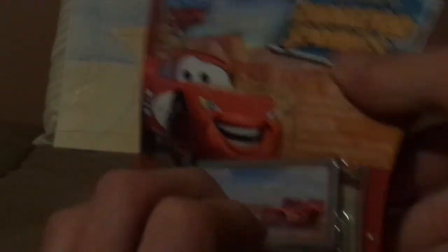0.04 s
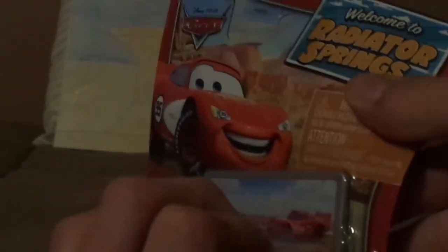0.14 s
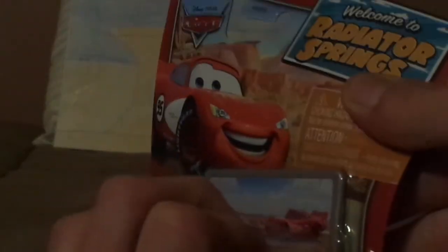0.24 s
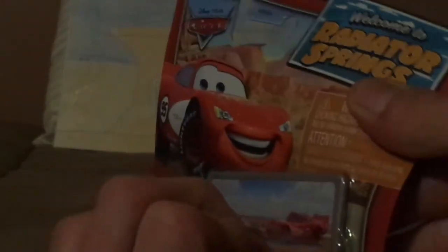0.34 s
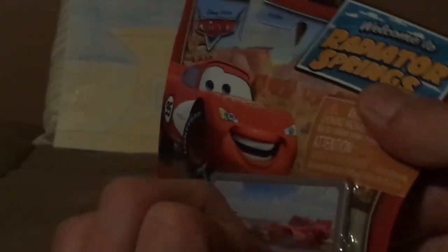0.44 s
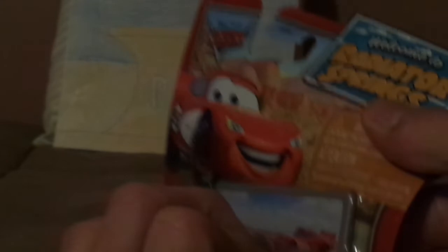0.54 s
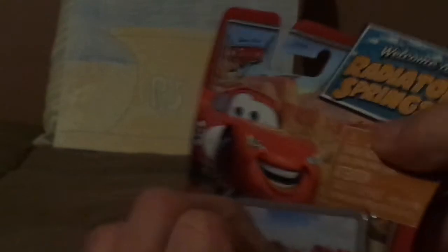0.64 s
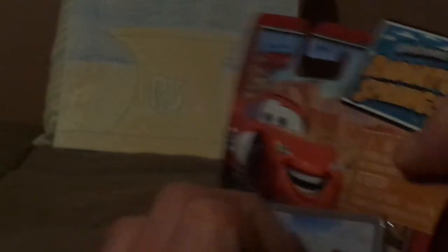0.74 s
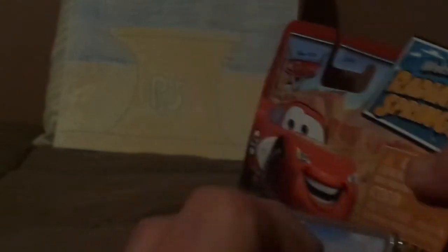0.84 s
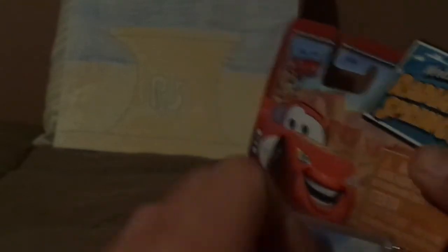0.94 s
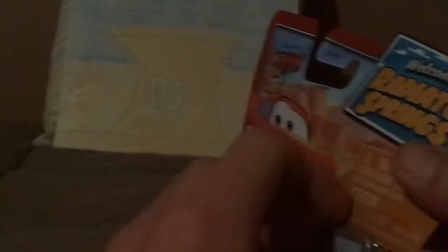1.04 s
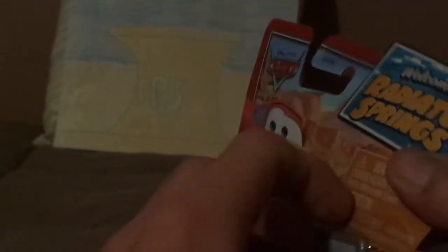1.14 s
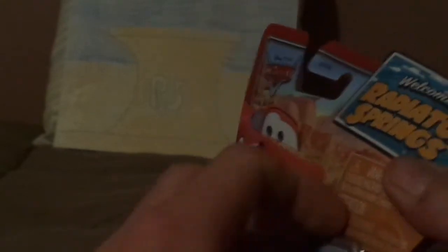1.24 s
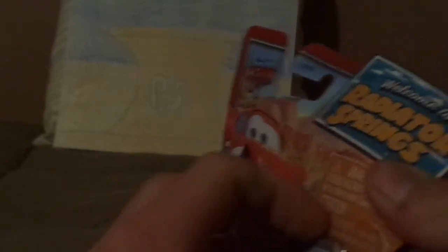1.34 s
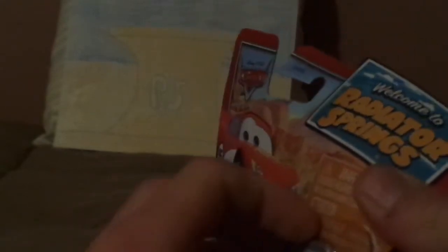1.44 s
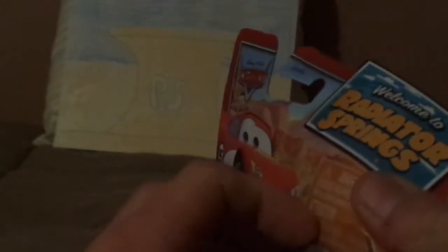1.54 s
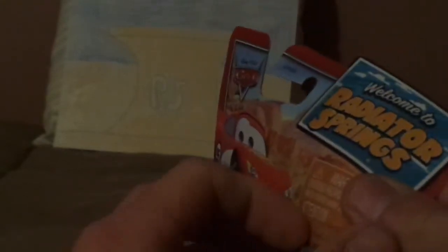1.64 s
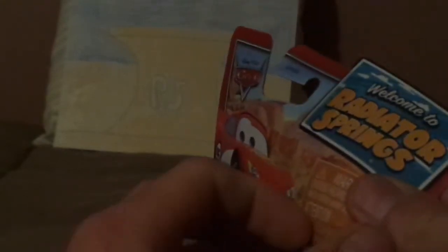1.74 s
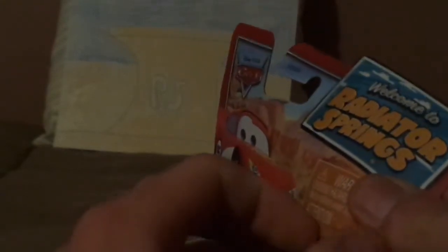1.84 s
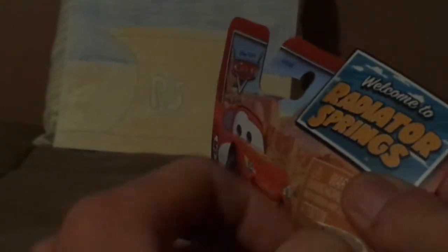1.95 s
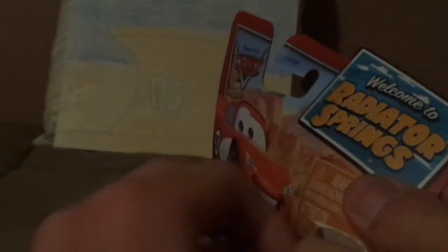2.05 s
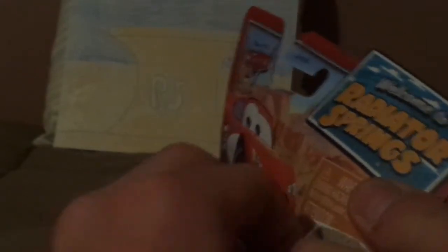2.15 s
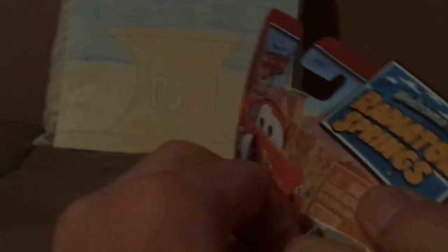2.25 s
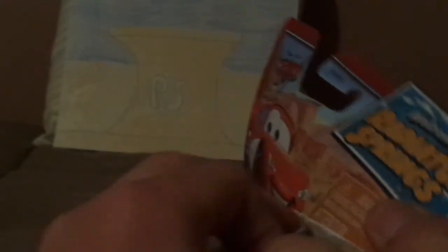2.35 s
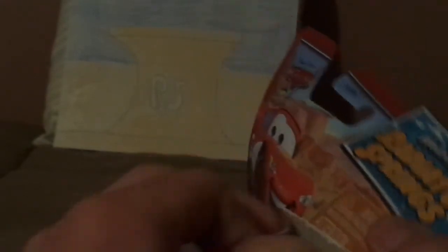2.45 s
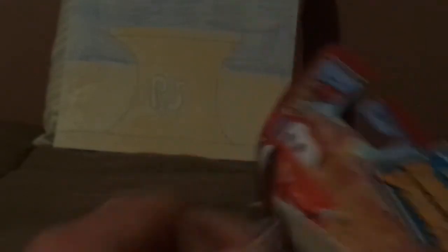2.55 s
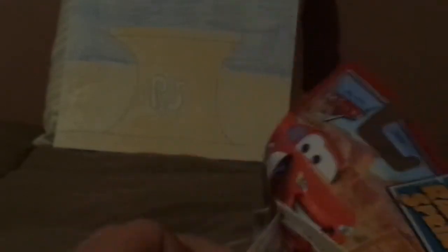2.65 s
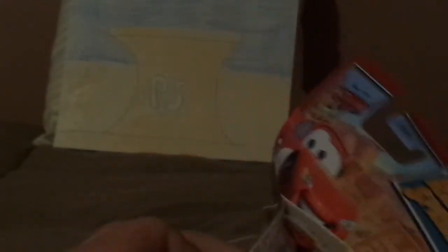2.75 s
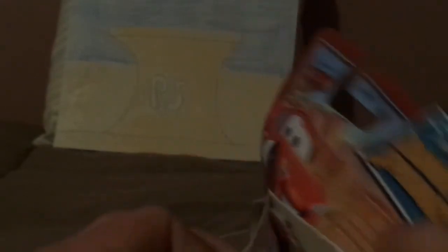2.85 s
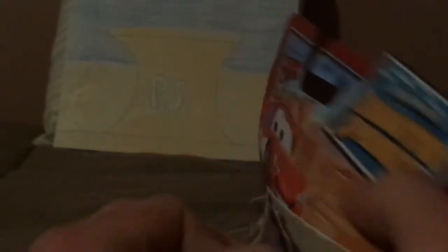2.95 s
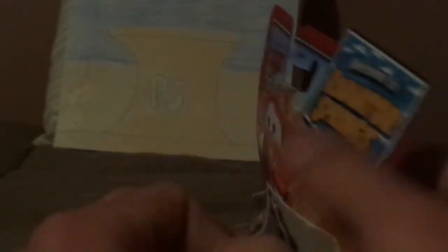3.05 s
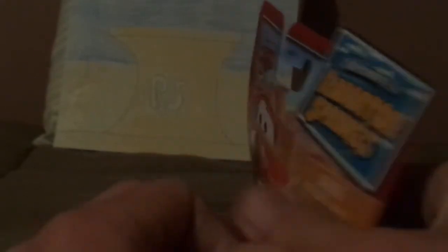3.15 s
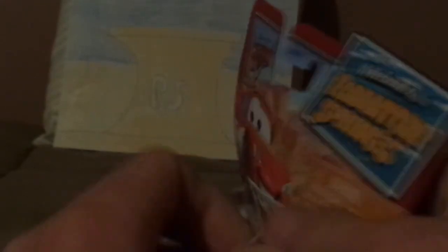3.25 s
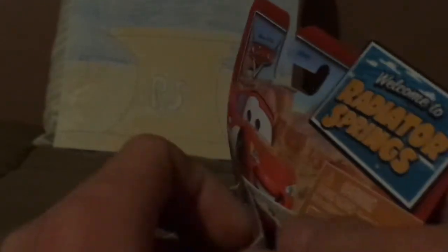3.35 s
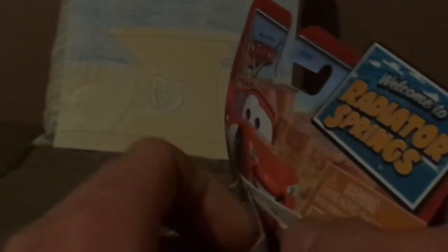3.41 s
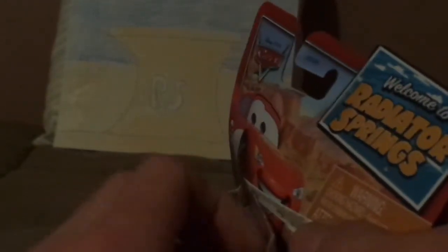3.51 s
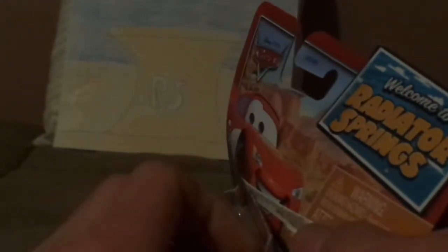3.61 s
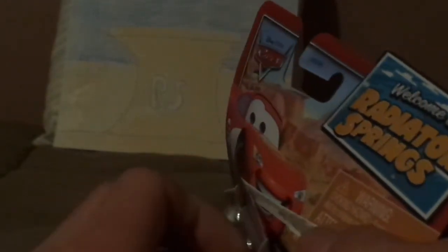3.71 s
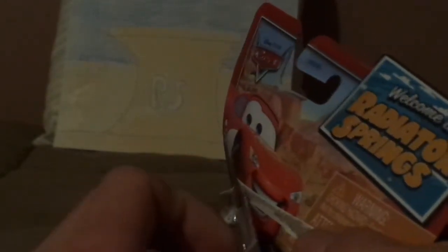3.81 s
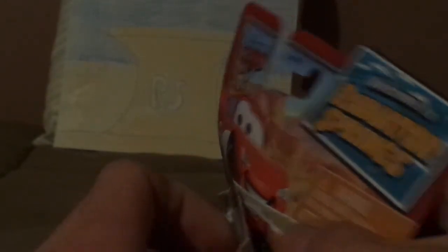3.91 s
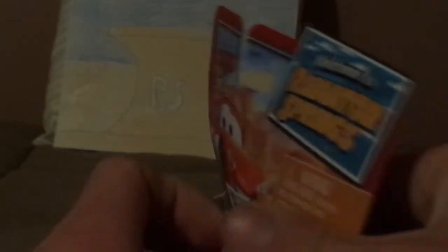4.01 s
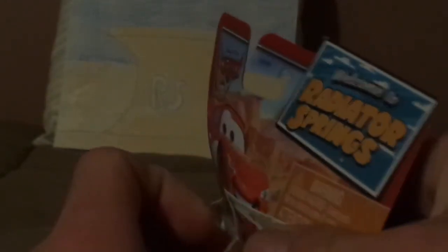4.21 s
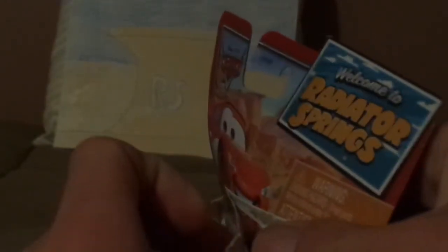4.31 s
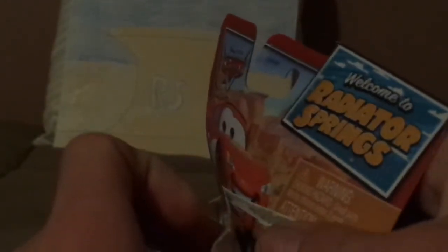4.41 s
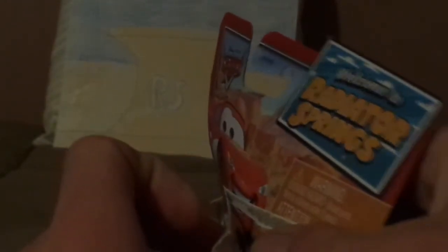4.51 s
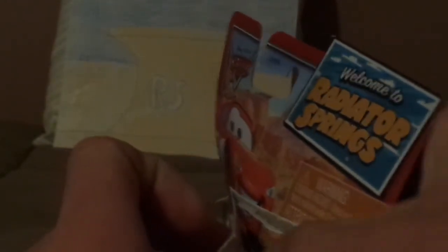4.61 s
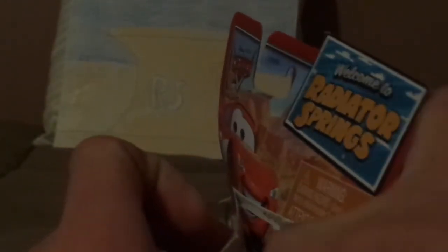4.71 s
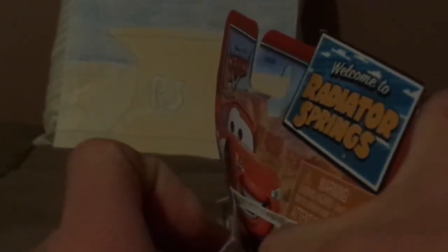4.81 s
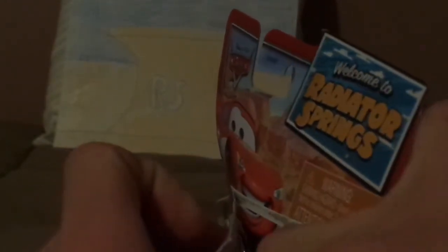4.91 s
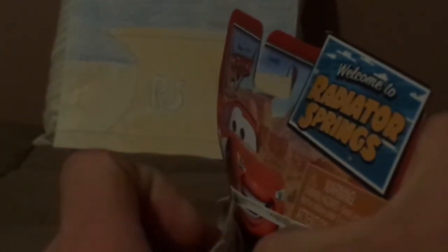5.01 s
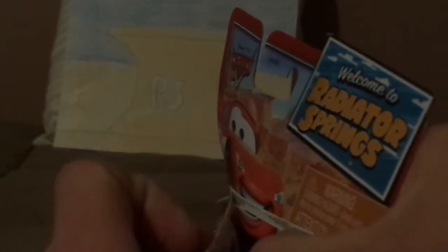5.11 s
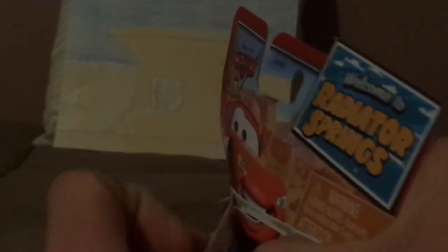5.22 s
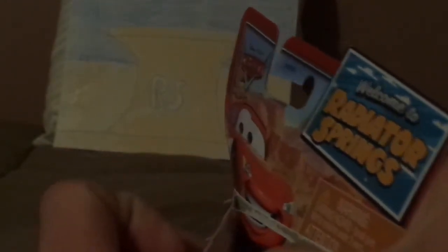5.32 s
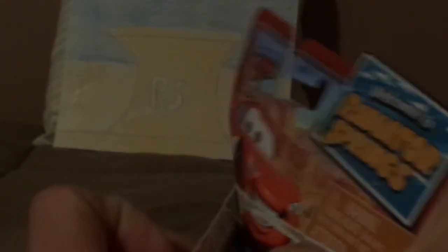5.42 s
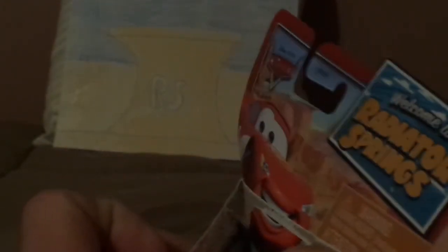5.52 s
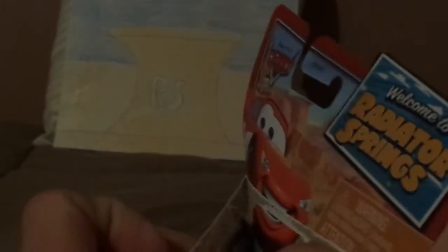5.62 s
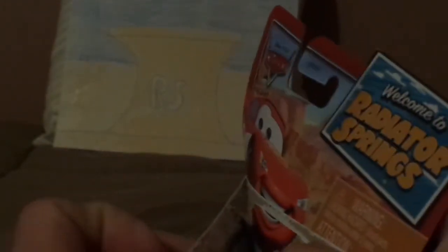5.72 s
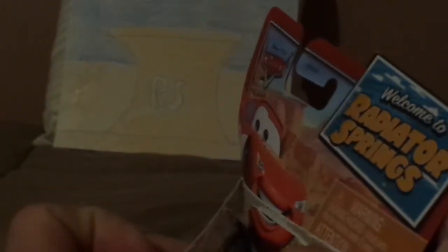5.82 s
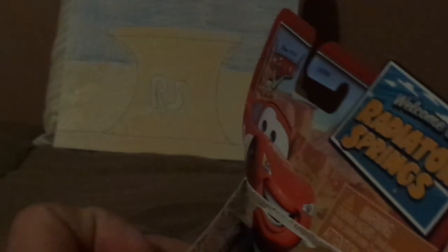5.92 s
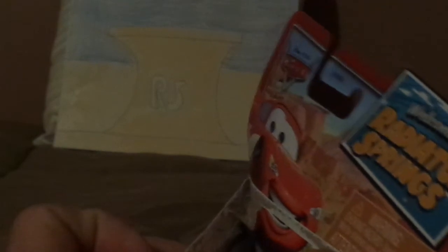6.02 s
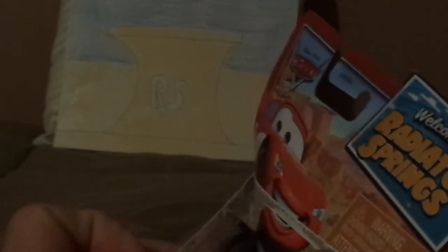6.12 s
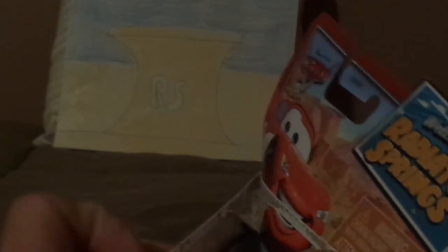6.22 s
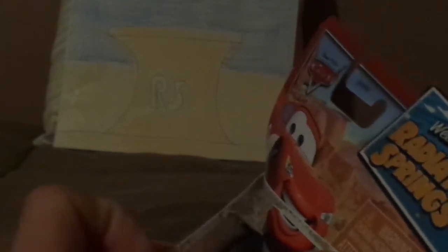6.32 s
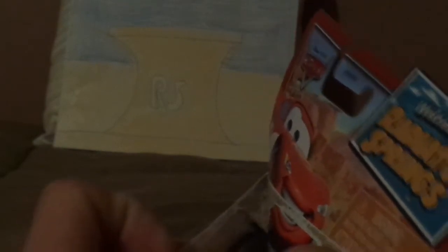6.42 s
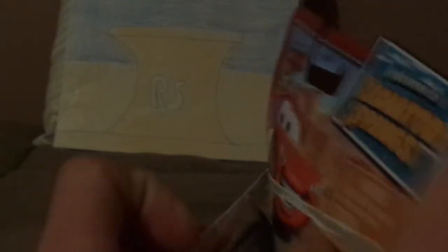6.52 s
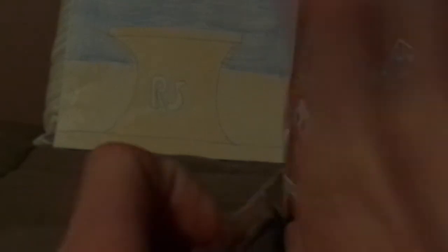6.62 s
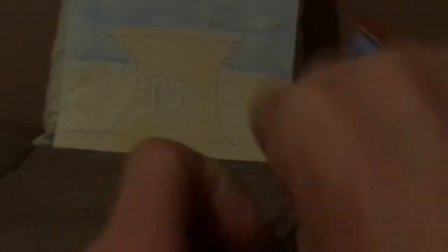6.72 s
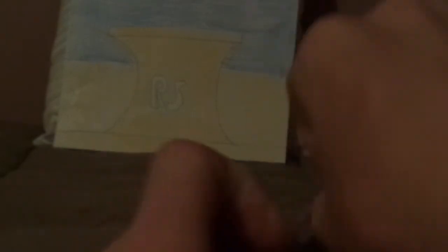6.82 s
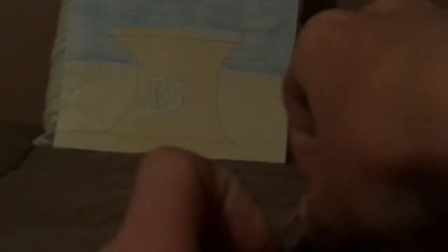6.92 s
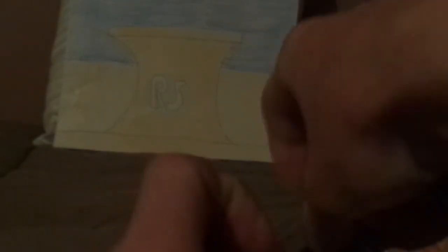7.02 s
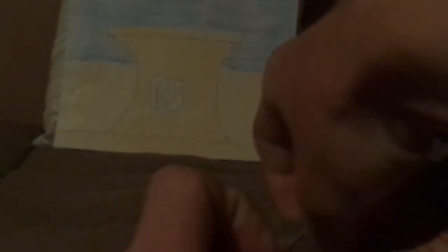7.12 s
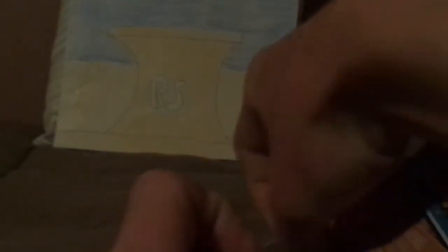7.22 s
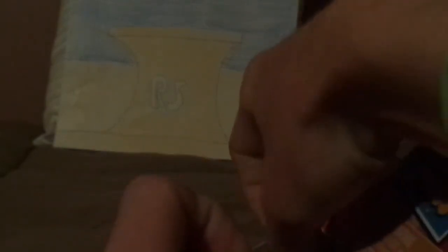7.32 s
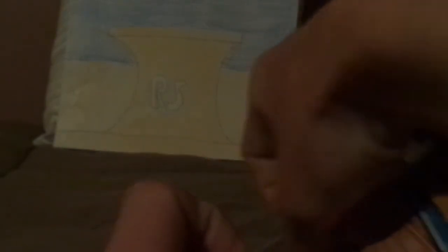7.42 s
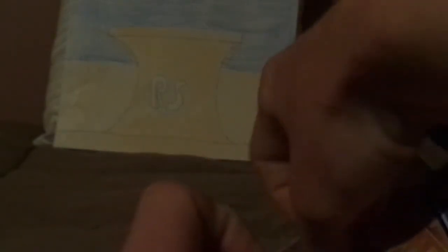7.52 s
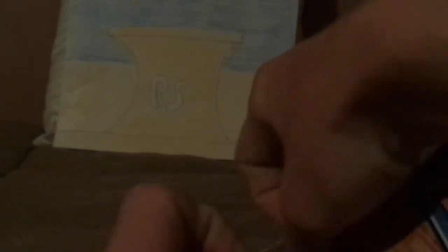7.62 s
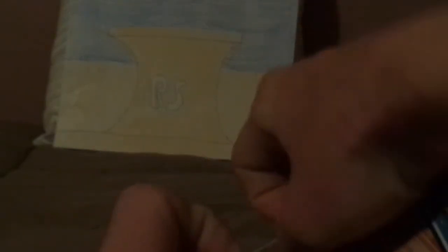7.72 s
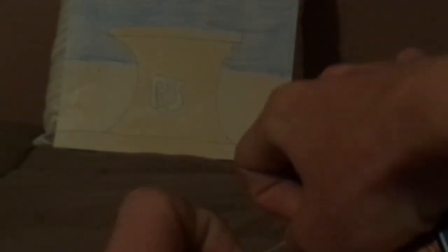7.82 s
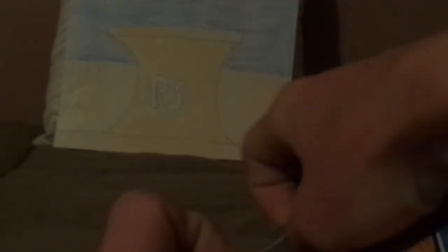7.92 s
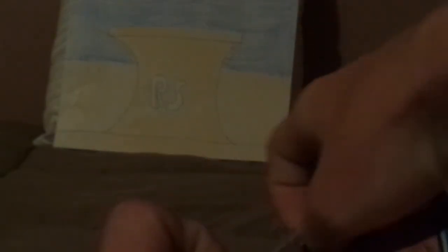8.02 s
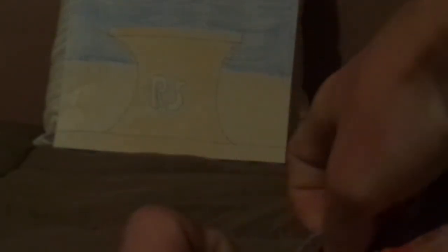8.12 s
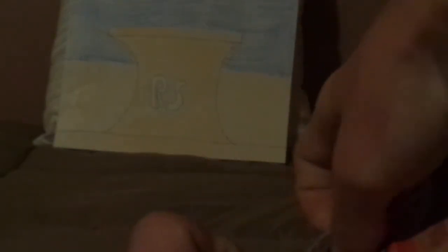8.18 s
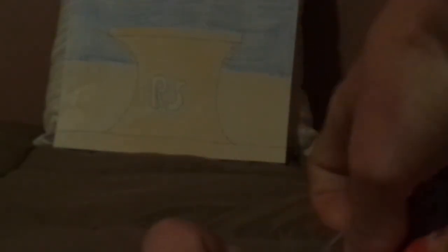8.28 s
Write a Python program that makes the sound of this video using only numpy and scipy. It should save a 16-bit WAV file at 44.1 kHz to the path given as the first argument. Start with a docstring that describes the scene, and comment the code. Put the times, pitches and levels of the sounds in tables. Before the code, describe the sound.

Hands tear a stiff plastic blister pack from its card, dense crackling and crinkling with sharp snaps and ripping, close up in a quiet room.

```python
"""Quiet furnished room: two hands tear a stiff plastic blister from its card, close to the microphone.
Glue joints and creases let go in snaps: noise bursts through broad resonances of card, shell and crack edge.
Glue also peels in runs of even jerks; each pull tears fibres and rubs the pack in dense random grains.
The room answers with decaying noise tails; steady mains hum and coloured hiss lie underneath."""
import sys
import numpy as np
from scipy import signal
from scipy.fft import rfft, irfft, next_fast_len
from scipy.io import wavfile
from scipy.ndimage import uniform_filter1d

SR = 44100
rng = np.random.default_rng(int(sys.argv[2]) if len(sys.argv) > 2 else 0)


def master_out(mix):
    """Clip the mix to full scale and print it as 16-bit PCM to the path in sys.argv[1]."""
    frames = np.transpose(np.atleast_2d(mix))
    ceiling = np.clip(frames, -1, 1)
    pcm = np.round(ceiling * 32767).astype(np.int16)
    wavfile.write(sys.argv[1], SR, pcm)


N = 368235

# loudest releases of creases and glue joints:
# [t/s, card thump energy/dB, card pitch/Hz, wall energy/dB, rim energy/dB, edge energy/dB]
SNAPS = [(0.0349, -23, 1180, -23, -31, -40), (0.116, -25, 1210, -21, -17, -37),
         (0.1615, -36, 655, -33, -20, -41), (0.1546, -16, 1240, -13.5, -15.5, -32),
         (0.1748, -24, 690, -14, -11.5, -23), (0.1901, -23, 664, -15, -13, -18),
         (0.1954, -17, 1290, -27, -11, -33), (0.2194, -13.5, 1240, -13.5, -12, -20),
         (0.2305, -40, 1080, -44, -19, -30), (0.2418, -34, 1280, -28, -19, -35),
         (0.257, -20, 700, -16, -16, -23), (0.2694, -19, 1280, -32, -18, -32),
         (0.277, -18.5, 710, -16, -13, -20), (0.2953, -17, 685, -15, -14, -28),
         (0.289, -34, 1130, -32, -17, -32), (0.3699, -14, 850, -13, -11.5, -18),
         (0.391, -19, 1240, -30, -20, -20), (0.4134, -13, 724, -14.5, -10.5, -28),
         (0.4342, -14, 1280, -32, -22, -18), (0.4434, -14, 730, -17, -11, -32),
         (0.4526, -18, 1260, -20, -15.5, -21), (0.5091, -18.5, 1250, -29, -18, -18.5),
         (0.5335, -15.5, 755, -21, -20, -35), (0.772, -28, 1190, -24, -22, -33),
         (1.0474, -18.5, 785, -46.5, -23, -22.5), (1.29, -41, 450, -38, -27, -20),
         (1.331, -41, 1280, -42, -26, -25), (1.365, -41, 1020, -39, -22, -21),
         (1.912, -31, 1260, -32, -40, -14), (2.0011, -22, 800, -32, -46, -36),
         (2.1273, -17, 1270, -23, -25, -21), (2.153, -18, 1280, -25, -29, -42),
         (2.1685, -31, 920, -27, -27, -27), (2.208, -15, 1260, -24, -29, -21),
         (2.263, -38, 804, -25, -41, -12.5), (2.2861, -29, 1200, -33, -27, -11.5),
         (2.441, -32, 960, -33, -15.5, -19), (2.5241, -2, 455, -15, -3.5, -19),
         (2.5648, -5.5, 1210, -8, -7, -22), (2.572, -16, 890, -17, -5, -18), (2.5827, -5, 880, -14, 0, 8.5),
         (2.5837, -26, 880, -35, -4, 8.5), (2.5953, -17, 1000, -25, -12, -1),
         (2.7823, -13.5, 1240, -16, -21.5, -26), (2.8412, 3.5, 793, -23, -24, -28),
         (2.8659, -19, 714, -24, -25, -30), (2.887, -17, 900, -20, -20, -25),
         (2.909, -23, 905, -23, -25, -28), (3.0025, -16, 920, -19.5, -24, -26),
         (3.0875, -15, 785, -13, -21, -26), (3.2572, -9.5, 820, -17.5, -22.5, -34),
         (3.399, -18, 1320, -21, -20.5, -33), (3.673, -16.5, 1280, -20, -24, -27.5),
         (3.7243, -20.5, 920, -18.5, -17, -35), (3.7594, -16.5, 1310, -18.5, -28, -33),
         (3.8061, -19.5, 1060, -19, -26, -28), (3.9296, -21.5, 1280, -38, -20.5, -34),
         (3.9689, -13.5, 1260, -16, -30, -27), (4.2046, -18, 1330, -17.5, -14.5, -21),
         (4.265, -27, 594, -42, -24.5, -19), (4.376, -1, 695, -0.5, -2.5, -12),
         (4.3808, -2, 1030, -13, -25, -21), (4.9816, -27, 870, -39, -15, -23),
         (5.127, -43, 450, -43, -41, -21), (5.216, -20, 864, -16.5, -18, -19.5),
         (5.2796, -14.5, 860, -15, -15.5, -16.5), (5.2839, -17, 830, -18, -14, -28),
         (5.3555, -18, 1030, -14.5, -17, -36), (5.3798, -13, 1130, -20, -11, -15),
         (5.4205, -18, 1140, -12.5, -18, -28), (5.4297, -20, 846, -13, -24, -20),
         (5.4393, -21, 790, -16, -18, -8), (5.452, -38, 800, -27, -25, -19),
         (5.5004, -22, 1300, -16.5, -21, -24), (5.5613, -20.5, 810, -15.5, -25, -38),
         (5.583, -20, 1260, -16, -25, -41), (5.6087, -23.5, 790, -14.5, -26, -44),
         (5.6345, -22, 800, -15.5, -24, -46), (5.656, -21, 770, -12, -22.5, -46),
         (5.671, -26, 790, -17, -24, -47), (5.7015, -18.5, 814, -12, -21.5, -31),
         (5.736, -27, 1300, -38, -20.5, -35), (5.9891, -28, 990, -36, -21.5, -18),
         (6.009, -11.5, 1170, -12.5, -10.5, -25), (6.1133, -29, 1220, -33, -23, -15.5),
         (6.1317, -29, 1220, -26, -16.5, -14), (6.147, -41, 584, -36, -21, -32),
         (6.247, -36, 1210, -42, -37, -23), (6.281, -25, 785, -16, -18, -21),
         (6.4132, -18.5, 740, -18, -37, -53), (6.4356, -35, 1240, -16.5, -36, -45),
         (6.4475, -20, 1340, -17, -37, -45), (6.4595, -19, 810, -19, -23, -27),
         (6.503, -26, 830, -18.5, -35, -39), (6.526, -14.5, 880, -22, -24, -18),
         (6.5423, -26, 870, -14.5, -20, -37), (6.6528, -19.5, 880, -16, -22.5, -45),
         (6.6967, -29.5, 860, -18, -26.5, -41), (6.7204, -17.5, 910, -16, -34, -43),
         (6.8157, -20.5, 865, -21, -22.5, -37), (6.8432, -25, 1030, -18.5, -20, -41),
         (6.9068, -22, 774, -27, -23, -31), (6.9932, -16.5, 700, -29, -12, -32),
         (7.1768, -17, 690, -42, -32, -45), (7.277, -40, 1000, -42, -26, -34),
         (7.301, -40, 1000, -40, -31, -26), (7.3285, -40, 1300, -40, -23, -20),
         (7.349, -30, 450, -43, -28, -28), (7.366, -38, 920, -35, -19, -17),
         (7.3739, -6, 1180, -29, -11.5, -26), (7.3763, -2, 860, -3, -5.5, -12.5),
         (7.488, -26, 810, -28, -18, -37), (7.5577, -27, 704, -37, -22, -26),
         (7.617, -25, 760, -42, -22, -24), (7.6545, -24, 790, -30, -17.5, -32),
         (7.6982, -21, 790, -42.5, -15, -37.5), (7.724, -33, 810, -32, -12.5, -31),
         (7.737, -30, 720, -32, -12, -24.5), (7.7456, -17.5, 890, -20, -8.5, -32),
         (7.763, -13.5, 980, -17, -6, -24), (7.892, -38, 850, -28, -20, -38),
         (7.933, -31, 393, -42, -19.5, -19), (7.9655, -20, 980, -9.5, -16.5, -21),
         (8.0856, -12, 990, -10, -10.5, -15), (8.0892, 2.5, 1070, -6, 1, -9),
         (8.0933, -1.5, 770, -18, -19, -26), (8.1, -8, 1000, -33, -32, -38),
         (8.2094, -21, 1020, -23, -18, -29), (8.3158, -15, 1020, -12.5, -16.5, -23.5)]


def amp(db):
    """Gain of a level in dB."""
    return 10 ** (np.asarray(db) / 20)


def unit(x):
    """Scaled to rms 1."""
    return x / np.sqrt(np.mean(x ** 2) + 1e-20)


def along(points, hz):
    """Value at hz, interpolated between (f/Hz, value) points on a log frequency axis."""
    f, v = np.transpose(points)
    return np.interp(np.log(hz + 1), np.log(f + 1), v)


def coloured(x, spectrum):
    """x through a causal minimum-phase filter with the given (f/Hz, level/dB) points."""
    size = 4096
    gain = amp(along(spectrum, np.fft.rfftfreq(size, 1 / SR)))
    # folding the cepstrum onto positive times gives minimum phase
    cepstrum = irfft(np.log(gain + 1e-6))
    cepstrum[1:size // 2] *= 2
    cepstrum[size // 2 + 1:] = 0
    impulse = irfft(np.exp(rfft(cepstrum)))
    return signal.fftconvolve(x, impulse)[:len(x)]


def background():
    """Steady hiss of room and preamplifier as coloured noise, with mains hum as sines."""
    # mains harmonics: [f/Hz, rms level/dB]
    hum_lines = [(120, -68), (240, -78.5), (360, -68)]
    # hiss colour: [f/Hz, relative density/dB]
    hiss_colour = [(25, -42), (90, -11), (160, -8), (330, -2.5), (600, -6.5), (1500, -7.5), (2500, -7.5),
                   (5000, -14.5), (9000, -16), (15300, -17.5)]
    hiss_rms_db = -57.5
    t = np.arange(N) / SR
    hum = sum(np.sqrt(2) * amp(db) * np.sin(2 * np.pi * hz * t) for hz, db in hum_lines)
    hiss = unit(coloured(rng.standard_normal(N), hiss_colour))
    return hum + amp(hiss_rms_db) * hiss


def effort(s):
    """Levels in dB of flexing, scraping and ripping at times s: powers of grip, pulls and settling add."""
    # pulls of the hands: [full strength at t/s, swell/s, hold/s, fade/s,
    #                      card flexing level/dB, shell scraping level/dB, fibre ripping level/dB]
    pull_table = [(.18, 0.31, 0.16, .08, -45.5, -54, -54.5), (.44, 0.049, 0.0092, 0.062, -52, -50, -54),
                  (0.54, .06, .15, 0.089, -46, -52.5, -55.5), (0.762, 0.15, 0.042, 0.14, -45.5, -53, -61),
                  (1.308, 0.16, 0.022, 0.077, -74, -63, -52.5), (1.909, 0.11, .02, 0.2, -69, -60, -49),
                  (2.16, 0.3, 0.1, 0.12, -51.5, -62, -54), (2.3, 0.071, 0.0091, 0.26, -49.5, -47, -38.5),
                  (2.404, 0.12, 0.12, .05, -54, -51, -46), (2.533, 0.029, 0.022, 0.14, -34, -38.5, -34.5),
                  (3.096, 0.42, 0.2, 0.13, -54.5, -61.5, -66.5),
                  (3.4, 0.045, 0.0088, 0.068, -49.5, -60, -59), (3.75, 0.15, .01, 0.18, -59, -60, -61),
                  (3.957, 0.044, 0.018, 0.066, -46.5, -52, -56), (4.217, 0.24, .01, 0.13, -47, -56, -57.5),
                  (4.775, 0.13, 0.19, 0.13, -56.5, -59.5, -57), (5.25, 0.3, 0.068, .1, -55.5, -58, -53.5),
                  (5.386, .06, 0.068, 0.11, -45.5, -48, -42), (5.547, 0.056, 0.15, 0.32, -60, -58, -71),
                  (6.008, 0.12, .01, 0.11, -51.5, -55, -49.5), (6.091, 0.12, .16, 0.16, -55, -58.5, -52.5),
                  (6.435, 0.083, 0.12, 0.18, -52, -56, -60.5), (6.718, .06, .01, .1, -43.5, -48.5, -61),
                  (6.828, 0.053, 0.0078, 0.1, -46.5, -51, -58.5), (7.01, 0.078, 0.068, .07, -53, -50, -58),
                  (7.335, 0.16, 0.011, 0.084, -59, -59, -57), (7.406, 0.063, 0.086, 0.33, -50, -54, -57.5),
                  (7.759, 0.27, .01, 0.083, -48.5, -42.5, -42.5),
                  (7.924, 0.21, 0.027, 0.29, -55, -52.5, -53), (8.173, .06, 0.0089, 0.15, -51, -57, -62),
                  (8.326, 0.12, .03, .1, -61, -55, -65)]
    # rustle of the pack while only held: [card level/dB, shell level/dB, fibre level/dB]
    grip_db = [-58.5, -71, -69.5]
    swell_db = 20  # gained over the swell time, lost over the fade time
    settle_db, settle_db_per_s = [-45, -44, -44.5], 144  # re card, rim and edge energy of a snap; decay
    t = np.arange(0, N / SR, .002)
    full, swell, hold, fade = np.transpose(pull_table)[:4, :, None]
    before = np.maximum(full - t, 0) / swell
    after = np.maximum(t - full - hold, 0) / fade
    pull = amp(-swell_db * (before + after))
    since = t - np.array(SNAPS)[:, :1]
    settle = (since > 0) * amp(-settle_db_per_s * np.abs(since))
    pull_db = np.array(pull_table)[:, 4:]
    snap_db = np.array(SNAPS)[:, [1, 4, 5]] + settle_db
    power = amp(pull_db).T ** 2 @ pull ** 2 + amp(snap_db).T ** 2 @ settle ** 2
    return [np.interp(s, t, 10 * np.log10(p + amp(db) ** 2)) for p, db in zip(power, grip_db)]


def grains(per_s, spread_db):
    """Tiny breaks at random samples; a few are much larger than the rest."""
    hit = rng.random(N) < per_s / SR
    size_db = spread_db * np.minimum(rng.exponential(size=N), 3)
    return hit * rng.standard_normal(N) * amp(size_db)


def shifting(x, depth_db):
    """The part of the pack that is worked keeps changing, and with it the colour of the rustle."""
    z = signal.stft(x, nperseg=256)[2]
    field = uniform_filter1d(rng.standard_normal(z.shape), size=7, axis=0)  # over frequency
    field = uniform_filter1d(field, size=20, axis=1)  # over time
    return unit(signal.istft(z * amp(depth_db * unit(field)), nperseg=256)[1][:N])


def tearing():
    """The same small breaks shake card and shell; fibres add their own denser rain."""
    # colours of card flexing, shell scraping and fibre ripping: [f/Hz, relative density/dB]
    flex_colour = [(150, -34), (350, -11), (750, -5.5), (1200, -6), (1800, -10.5), (3000, -42.5)]
    scrape_colour = [(200, -44), (1900, -4), (2800, 2), (4200, -2.5), (5800, -8.5), (8000, -19)]
    rip_colour = [(300, -70), (2500, -30), (5500, 6), (8000, 5), (10500, 3), (13000, 0.5), (15500, -13.5)]
    flex_db, scrape_db, rip_db = effort(np.arange(N) / SR)
    breaks = unit(grains(per_s=1500, spread_db=3))
    fibres = unit(grains(per_s=6000, spread_db=2.5))
    flex = coloured(breaks + 0.88 * rng.standard_normal(N), flex_colour)
    flex = shifting(flex, depth_db=3.5)
    scrape = shifting(coloured(breaks + .6 * fibres, scrape_colour), depth_db=2)
    rip = shifting(coloured(.4 * breaks + fibres, rip_colour), depth_db=2)
    return amp(flex_db) * flex + amp(scrape_db) * scrape + amp(rip_db) * rip


def release(hz, width_hz, t60_s, jolt):
    """Per snap, a sudden jolt and a dying rattle of noise through a broad resonance; energy 1."""
    size = 2048
    t, f = np.arange(size) / SR, np.fft.rfftfreq(size, 1 / SR)
    rattle = amp(-60 * t / t60_s) * rng.standard_normal((len(hz), size))
    rattle /= np.linalg.norm(rattle, axis=1, keepdims=True)
    force = rfft(rattle) + jolt
    resonance = 1j * f * width_hz / (hz * hz - f * f + 1j * f * width_hz)
    ring = irfft(force * resonance ** 2 / (1 + 1j * f / hz))  # little is radiated above the resonance
    return ring / np.linalg.norm(ring, axis=1, keepdims=True)


def slips():
    """Stick and slip: gaps stay equal or lengthen evenly through a run; rows like those of SNAPS."""
    # runs of peeling glue: [first t/s, length/s, first gap/s, last gap/s, swell/dB, card energy/dB,
    #                        card pitch/Hz, wall energy/dB, rim energy/dB, edge energy/dB]
    slip_runs = [(.064, .086, .0072, .0085, 3, -22, 1210, -23, -23, -40),
                 (.3032, .055, .008, .0125, 1, -20, 1010, -26, -17.5, -22.5),
                 (.581, .024, .003, .003, 2, -33, 1000, -36, -26.5, -27),
                 (0.6306, .065, .009, .0105, -11, -18.5, 1230, -16, -17, -20.5)]
    spread_db = 1.5
    rows = []
    for first, length, gap, last, swell_db, card_db, hz, *shell_db in slip_runs:
        gaps = np.linspace(gap, last, int(2 * length / (gap + last)))
        s = first + np.cumsum(gaps) - gap
        db = swell_db * (s[:, None] - first) / length + [card_db, *shell_db]
        db = db + spread_db * rng.standard_normal(db.shape)
        rows.append(np.column_stack([s, db[:, 0], hz + 0 * s, db[:, 1:]]))
    return np.vstack(rows)


def crackle():
    """Small creases let go at random, as strongly as the pack is worked; rows like those of SNAPS."""
    per_s, pitch_range_hz = 60, (645, 1280)
    energy_db, spread_db = [18.3, 15.7, 21.4, 19.4], 5  # card, wall, rim and edge re the rustle; scatter
    count = int(per_s * N / SR)
    s, pitch = rng.random((count, 2)).T * [[N / SR], [1]]
    flex_db, scrape_db, rip_db = effort(s)
    db = np.transpose([flex_db, scrape_db, scrape_db, rip_db]) + energy_db
    db = db + spread_db * rng.standard_normal(db.shape)
    card_hz = np.interp(pitch, [0, 1], pitch_range_hz)
    return np.column_stack([s, db[:, 0], card_hz, db[:, 1:]])


def laid(times_s, rows):
    """One short sound per row, added at its time."""
    index = np.round(times_s * SR).astype(int)[:, None] + np.arange(rows.shape[1])
    return np.bincount(index.ravel(), rows.ravel(), N + SR)[:N]


def snaps():
    """Each release thumps the card and rings wall, rim and edge; stronger shell rings die more slowly."""
    # wall, rim and crack edge of the shell: [mean f/Hz, width/Hz, t60 at -20 dB energy/s]
    shell_parts = [(2000, 860, 0.03), (3790, 3920, 0.021), (12460, 13200, 0.015)]
    events = np.vstack([SNAPS, slips(), crackle()])
    s, card_db, card_hz, *shell_db = events.T[..., None]
    rows = amp(card_db) * release(card_hz, .45 * card_hz, t60_s=.03, jolt=1.2)
    bow = release(280 + 0 * s, 310, t60_s=0.042, jolt=0.36)  # the whole card bows
    rows += amp(card_db - 16.0) * bow
    for db, (hz, width_hz, t60_s) in zip(shell_db, shell_parts):
        patch = amp(.25 * rng.standard_normal(s.shape))  # no two patches of shell are the same size
        ring_t60_s = t60_s * amp(.1 * (db + 20))
        rows += amp(db) * release(hz * patch, width_hz, ring_t60_s, jolt=1.4)
    return laid(s[:, 0], rows)


def room(x):
    """Each frequency dies at its own speed; the hands move, so the echo pattern keeps changing."""
    # reverberation: [f/Hz, t60/s]
    wall_t60 = [(200, 0.54), (1000, 0.27), (4000, 0.27), (12000, 0.1)]
    step, delay = SR // 4, 250  # samples
    out = np.zeros(N + 2 * SR)
    for start in range(0, N, step):
        hz, t, z = signal.stft(rng.standard_normal(SR // 2), SR, nperseg=256)
        decay = amp(-60 * t / along(wall_t60, hz)[:, None])
        tail = signal.istft(z * decay, SR, nperseg=256)[1]
        answer = signal.fftconvolve(x[start:start + step], tail / np.linalg.norm(tail))
        out[start + delay:][:len(answer)] += answer
    return out[:N]


def scene():
    """Nearly mono; a faint phase-scrambled copy of the whole, weighted by frequency, parts left and right."""
    # scrambled copy: [f/Hz, side re mid/dB]
    side_level = [(30, -20), (120, -23), (500, -39.5), (4000, -37.5), (12000, -28.5)]
    pack = snaps() + tearing()
    mid = pack + amp(-14.0) * room(pack) + background()
    hz, _, z = signal.stft(mid, SR, nperseg=256)
    scatter = np.exp(2j * np.pi * rng.random(z.shape))  # random phases
    side_gain = amp(along(side_level, hz))[:, None]
    side = signal.istft(z * scatter * side_gain, SR, nperseg=256)[1][:N]
    return np.array([mid + side, mid - side])


def record(dry):
    """The input clips at full scale, then a steep low-pass keeps nothing above its band limit."""
    top_hz, slope_hz = 15550, 500
    m = next_fast_len(N + SR)
    edge = np.clip((top_hz - np.fft.rfftfreq(m, 1 / SR)) / slope_hz, 0, 1)
    return irfft(rfft(np.clip(dry, -1, 1), m) * edge, m)[:, :N]


dry = scene()
out = record(dry)
master_out(out)
```